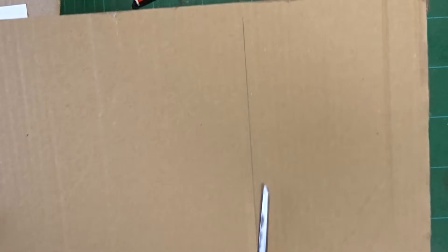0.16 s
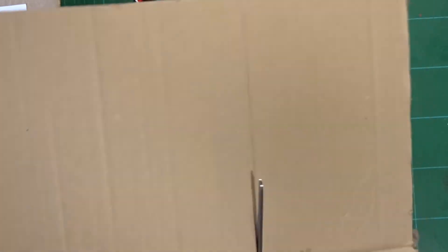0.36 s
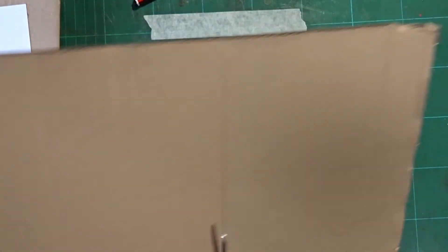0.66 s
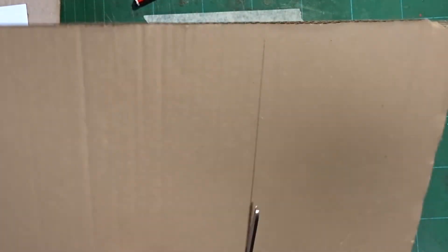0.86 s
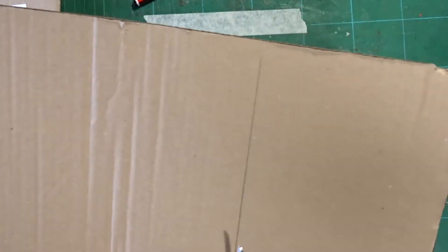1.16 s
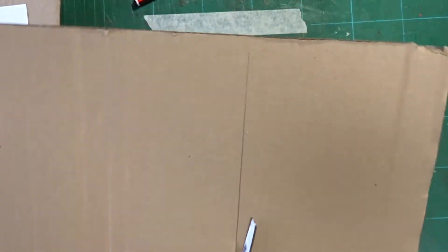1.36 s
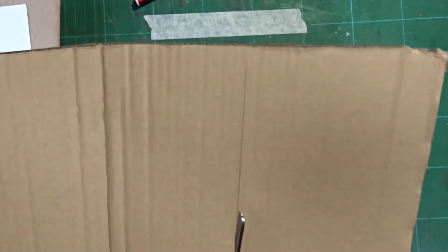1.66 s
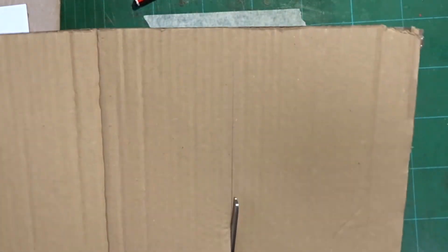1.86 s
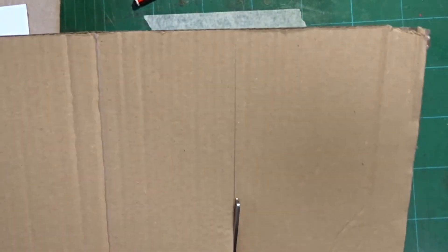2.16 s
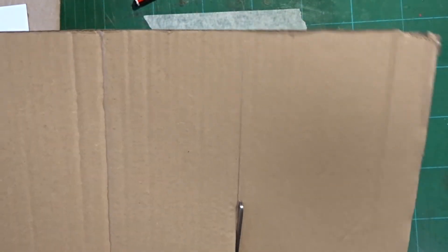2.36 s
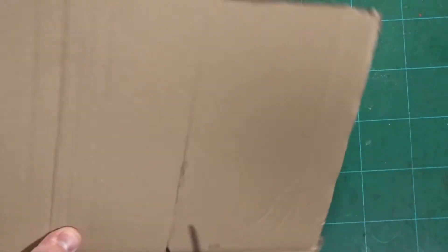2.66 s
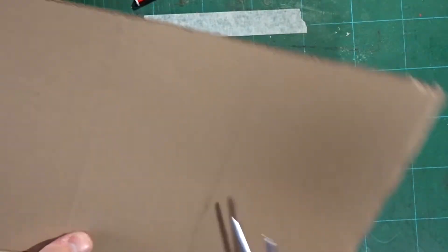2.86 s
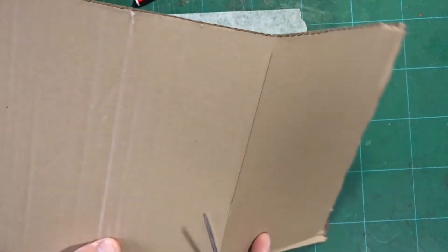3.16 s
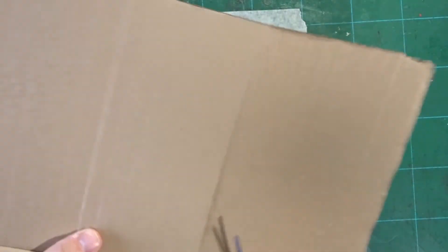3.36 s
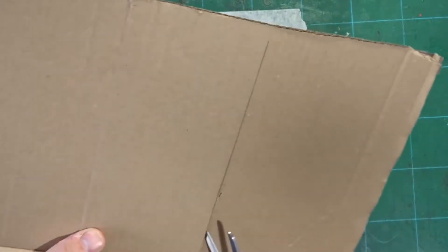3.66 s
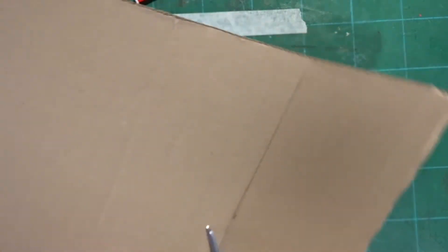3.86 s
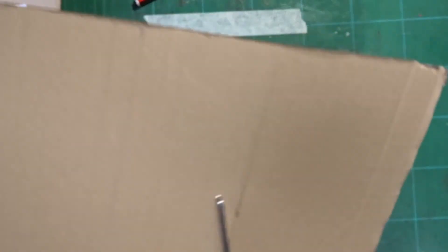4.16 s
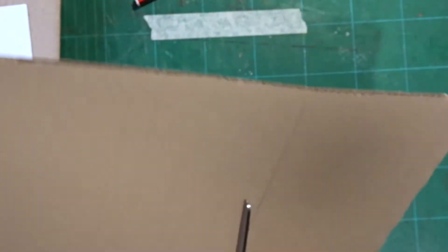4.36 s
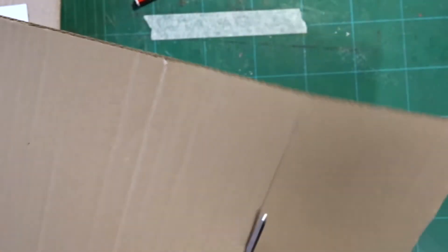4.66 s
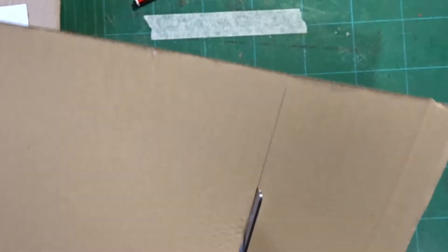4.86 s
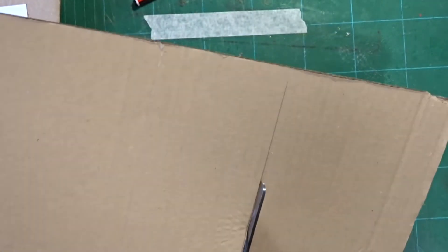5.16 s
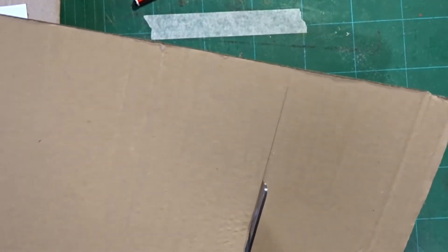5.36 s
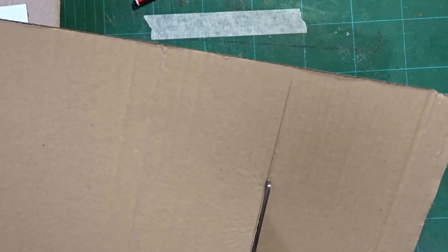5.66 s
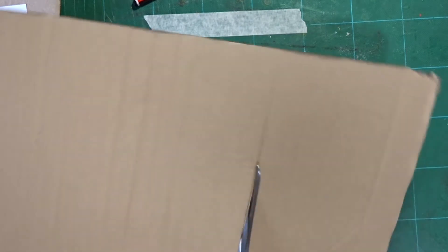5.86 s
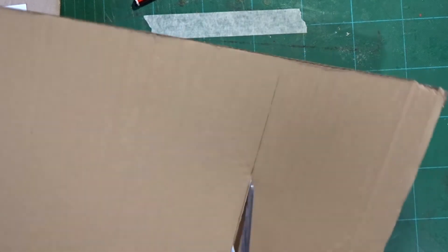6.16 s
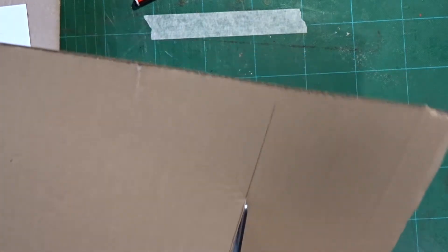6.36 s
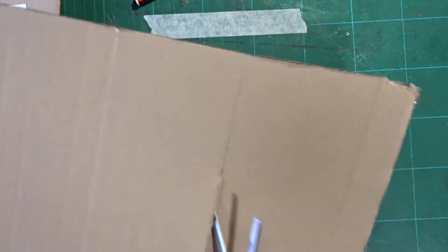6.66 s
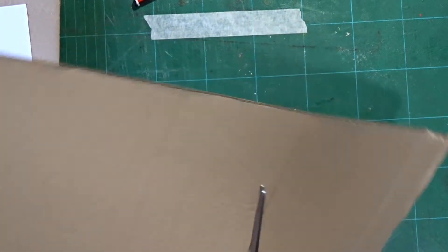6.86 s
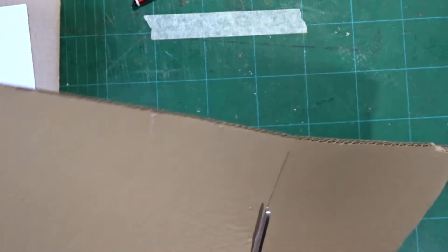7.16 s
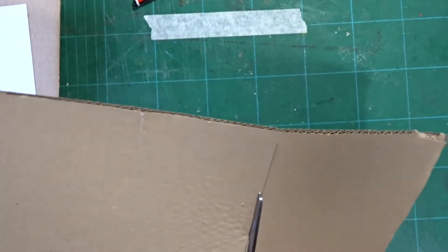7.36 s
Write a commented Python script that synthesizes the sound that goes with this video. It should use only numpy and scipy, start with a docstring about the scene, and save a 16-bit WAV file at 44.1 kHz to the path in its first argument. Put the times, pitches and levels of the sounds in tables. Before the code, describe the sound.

Scissors work through a big sheet of corrugated cardboard, dry scrapes and crunching cracks with hollow board knocks, close up in a quiet room.

```python
"""A small quiet room: scissors are worked through a big sheet of corrugated cardboard held over a table.
Blades and fingers slide on the paper face (stuttering noise in third-octave bands); cut flutes crack
(short noise bursts). The sheet, knocked and flexed, answers with dull board modes (decaying sines), and
groans briefly (resonated noise). The scissor joint ticks now and then. A short echo and room tone lie under it."""
import sys
import numpy as np
from scipy import signal
from scipy.fft import rfft, irfft
from scipy.io import wavfile
from scipy.ndimage import uniform_filter1d

SR = 44100
rng = np.random.default_rng(int(sys.argv[2]) if len(sys.argv) > 2 else 0)


def wrap_up_sound(samples):
    """Save the sound to the file named by the first command line argument, as 16-bit audio."""
    columns = np.atleast_2d(samples).T
    # keep every value between -1 and 1, then stretch to whole-number steps
    tamed = np.clip(columns, -1, 1)
    steps = np.round(tamed * 32767).astype(np.int16)
    wavfile.write(sys.argv[1], SR, steps)


N = 330750
STEP = 40   # samples per point of slow controls

# board modes of the sheet: freq_hz, level_db (relative), t60_s
BOARD_MODES = [(382.7, 1, 0.042), (452.7, -0.5, 0.061), (549.3, 0.5, 0.045), (660, -2.5, 0.058),
               (746, -0.5, 0.036), (886, -0.5, 0.024), (1053, 2, 0.025), (1254, 3, 0.011),
               (1588, -2, 0.019), (1730, -31.5, .02)]
# slow bending modes of the whole sheet: freq_hz, level_db (relative), t60_s
BENDING_MODES = [(49, -15.5, .15), (78.6, -4.5, 0.19), (118, -10, 0.17), (186, 2.5, 0.063),
                 (256, -5.5, 0.11), (274, -3, 0.09)]


def from_db(db):
    """Level to amplitude gain."""
    return 10 ** (np.asarray(db) / 20)


def rms_one(x):
    """Scale to rms 1."""
    return x / np.sqrt(np.mean(x ** 2) + 1e-20)


def at_hz(points, hz):
    """Read a (freq_hz, value) table on a log frequency axis."""
    table = np.array(points)
    return np.interp(np.log(hz), np.log(table[:, 0]), table[:, 1])


def upsample(slow):
    """Slow control points to N samples."""
    return np.interp(np.arange(N) / STEP, np.arange(len(slow)), slow)


def drift(rate_hz):
    """Slow random wander of rms 1: noise through two equal poles at rate_hz."""
    r = np.exp(-2 * np.pi * rate_hz * STEP / SR)
    noise = rng.standard_normal(N // STEP + 2002)
    slow = signal.lfilter([1], [1, -2 * r, r * r], noise)[2000:]   # drop the settling
    return upsample(rms_one(slow))


def ring(force, hz, t60_s):
    """Two-pole resonator: a unit click starts a decaying sine of height 1."""
    r = from_db(-60 / (t60_s * SR))
    w = 2 * np.pi * hz / SR
    return signal.lfilter([0, np.sin(w)], [1, -2 * r * np.cos(w), r * r], force + 1e-18)


def grit(per_s, spread_db):
    """Fibres let go at random: uneven noise bursts, decay constant 0.47 ms, over a fine grain."""
    size_db = spread_db * np.minimum(rng.exponential(1, N), 3.5)
    releases = from_db(size_db) * (rng.random(N) < per_s / SR)
    bursts = signal.lfilter([1], [1, -np.exp(-1 / (0.00047 * SR))], releases)
    return rng.standard_normal(N) * (1 + bursts)


def focus_db(hz, centre_hz):
    """Where the sheet is held favours the modes near one pitch."""
    octaves = np.minimum(np.abs(np.log2(hz / centre_hz)), .7)
    return -12 * octaves ** 2


def rubbing():
    """Levels in dB of rasp, scrape, hiss, drumming and rumble: each rub grips, swells and fades."""
    # rubs of blade or hand on the card: start_s, length_s, swell_db (over the rub), fade_s (30 dB down),
    # then starting levels rasp_db, scrape_db, hiss_db, drum_db, rumble_db
    rubs = [(0.0, 0.037, 2, 0.11, -51.5, -48.5, -45, -42, -43.5),
            (0.099, 0.036, 0.5, 0.065, -59, -55, -42.5, -53, -56),
            (0.182, 0.011, -5, 0.064, -57, -43.5, -47, -58, -66),
            (0.225, .02, -1, 0.15, -58, -59, -57, -50, -54),
            (0.303, 0.086, 6.5, 0.12, -57.5, -59, -45, -56.5, -61),
            (0.48, .21, 12.5, 0.17, -61.5, -54, -45, -62.5, -62.5),
            (0.759, 0.043, -1, .04, -53, -47.5, -47, -48, -54),
            (0.845, .095, -1.5, 0.068, -53, -49, -47, -52.5, -53),
            (0.995, 0.0079, -2, 0.077, -45.5, -49, -45, -47, -35.5),
            (1.078, 0.053, 4.5, 0.066, -54, -51, -45, -46.5, -47),
            (1.182, .04, 0.5, 0.083, -59, -63, -58, -52, -45),
            (1.247, 0.041, 0, 0.054, -46.5, -47.5, -54, -36.5, -58),
            (1.318, 0.021, -5.5, 0.13, -36.5, -44, -44, -37, -48),
            (1.432, 0.058, 5, 0.025, -50.5, -42.5, -42, -40.5, -47),
            (1.545, 0.021, -10, 0.051, -47, -38.5, -37.5, -42, -30.5),
            (1.616, 0.016, -7, .08, -57, -57, -55, -45.5, -51),
            (1.68, 0.076, -3, 0.24, -71, -53.5, -53, -49, -51),
            (1.795, 0.058, -2, .05, -75, -59, -71, -46, -53),
            (1.872, 0.034, -6.5, 0.046, -40, -41.5, -35, -25.5, -44),
            (1.936, 0.096, 1, 0.07, -69, -63.5, -59, -63, -62),
            (2.176, 0.055, 10, 0.12, -44.5, -45.5, -41, -42.5, -47),
            (2.412, 0.032, -1, 0.26, -60, -57, -52.5, -52, -52),
            (2.496, 0.066, 3.5, 0.081, -40, -41, -41.5, -36, -44.5),
            (2.581, 0.098, -1, 0.12, -46, -58, -57, -44, -41),
            (2.698, 0.11, 2, 0.056, -46, -49, -54, -49, -49.5),
            (2.932, 0.054, -1.5, 0.046, -35, -46, -55, -45, -43),
            (3.038, 0.066, 4, 0.3, -54.5, -54, -58, -54, -56),
            (3.133, 0.036, 2.5, .12, -41.5, -46, -49, -43.5, -41.5),
            (3.202, 0.11, 10.5, 0.058, -56.5, -54, -48.5, -53.5, -72),
            (3.363, 0.076, 3, 0.097, -73, -47.5, -44.5, -59, -63),
            (3.585, 0.01, -3, 0.093, -62, -65, -62, -50, -37),
            (3.744, 0.31, -5.5, 0.67, -45.5, -41, -39, -39, -44),
            (4.211, 0.03, 1, 0.27, -49, -38, -41, -33, -36.5),
            (4.455, 0.063, 6, 0.097, -61, -51.5, -54.5, -47, -52),
            (4.59, 0.011, 2.5, 0.044, -46, -32.5, -35.5, -30.5, -40),
            (4.626, 0.071, 6, 0.2, -52.5, -48.5, -44.5, -41.5, -41.5),
            (4.788, 0.043, -0.5, 0.087, -57, -52, -63, -46.5, -45),
            (4.889, 0.067, -7, 0.045, -58.5, -62, -56.5, -43.5, -49),
            (5.05, 0.11, 12, 0.083, -63, -50, -52.5, -48, -63),
            (5.394, 0.011, -10, 0.053, -48, -51, -39, -45, -41),
            (5.438, 0.014, -9.5, 0.063, -41, -33.5, -32, -30, -52),
            (5.523, 0.042, 7, 0.039, -42, -42, -36, -45.5, -44.5),
            (5.61, 0.043, -4.5, 0.044, -46, -42.5, -34, -35, -51),
            (5.651, 0.021, 0, 0.12, -36, -33.5, -38, -29.5, -34.5),
            (5.895, 0.11, -2.5, 0.2, -46, -35.5, -35, -32, -38.5),
            (6.103, .15, 0, 0.15, -59, -49, -49.5, -43.5, -46),
            (6.309, 0.098, -3, 0.14, -62.5, -60, -76.5, -45, -52),
            (6.476, 0.18, 0, 0.044, -50.5, -47.5, -45, -44, -42.5),
            (6.687, 0.16, 8, 0.064, -60, -50, -50, -46, -54.5),
            (6.85, 0.046, -2, .05, -65, -39, -42, -48, -42),
            (6.89, 0.0083, 1, 0.081, -50, -37, -33.5, -29.5, -38),
            (6.992, 0.036, 2, .17, -53, -43.5, -43, -38, -37.5),
            (7.271, 0.11, -8, 0.2, -63.5, -52, -52.5, -40.5, -44),
            (7.46, .05, -0.5, 0.092, -84, -64, -63, -54, -48)]
    # hands merely holding the sheet: rasp_db, scrape_db, hiss_db, drum_db, rumble_db
    holding_db = [-70.5, -71, -67, -63.5, -62]
    grip_s = 0.033   # rise through 30 dB
    sheet_swell, sheet_lingers = 1, 1.21   # drum and rumble: share of the swell, stretch of grip and fade
    t = np.arange(0, N + STEP, STEP) / SR
    swell_share = np.array([1, 1, 1, sheet_swell, sheet_swell])[:, None]
    slower = np.array([1, 1, 1, sheet_lingers, sheet_lingers])[:, None]
    power = from_db(2 * np.array(holding_db))[:, None] + 0 * t
    for start_s, length_s, swell_db, fade_s, *levels_db in rubs:
        grip = np.maximum(start_s - t, 0) / grip_s
        fade = np.maximum(t - start_s - length_s, 0) / fade_s
        progress = np.clip((t - start_s) / length_s, 0, 1)
        shape_db = swell_share * swell_db * progress - 30 * (grip + fade) / slower
        power = power + from_db(2 * (np.array(levels_db)[:, None] + shape_db))
    return [np.interp(np.arange(N) / SR, t, 10 * np.log10(p)) for p in power]


def patchy(x, layers, patchy_db):
    """Third-octave bands carry the (level_db, spectrum) layers and swell on their own as the contact shifts."""
    centres_hz = 700 * 2 ** (np.arange(15) / 3)
    bin_hz = np.maximum(np.fft.rfftfreq(N, 1 / SR), 1)
    place = 3 * np.log2(bin_hz / centres_hz[0])   # position in bands
    shares = [from_db(2 * at_hz(shape, centres_hz)) * centres_hz for _, shape in layers]   # power per band
    powers = [from_db(2 * level_db[::STEP]) / np.sum(share)
              for (level_db, _), share in zip(layers, shares)]
    spectrum, out = rfft(x), np.zeros(N)
    for k in range(len(centres_hz)):
        weight = np.sqrt(np.clip(1 - np.abs(place - k), 0, 1))
        band = rms_one(irfft(spectrum * weight, N))
        gain = np.sqrt(sum(power * share[k] for power, share in zip(powers, shares)))
        swell = from_db(patchy_db * (drift(9) + .6 * drift(70)))
        out += upsample(gain) * swell * band
    return out


def sliding(rasp_db, scrape_db, hiss_db):
    """Friction on paper: a rasp over the hollow flutes, a gritty scrape and a fine hiss that stutter together."""
    # spectrum of the rasp: freq_hz, density_db (per Hz, relative)
    rasp = [(800, -10), (1200, 3.5), (1700, 3), (2200, 4.5), (2800, -2.5), (3600, -19.5)]
    # spectrum of the scrape: freq_hz, density_db (per Hz, relative)
    scrape = [(1800, -28), (2800, 5), (3700, 7.5), (5000, 3), (6500, -7.5), (9000, -31.5)]
    # spectrum of the fine hiss: freq_hz, density_db (per Hz, relative)
    hiss = [(4000, -10), (6500, -5.5), (9000, -4.5), (12500, -3), (14500, -5.5), (18000, -9.5)]
    layers = [(rasp_db, rasp), (scrape_db, scrape), (hiss_db, hiss)]
    stutter = from_db(1.5 * drift(34) - 5.0)
    return stutter * patchy(grit(260, spread_db=2.0), layers, patchy_db=2.5)


def shake(force, modes, centre_hz=None):
    """A steady rough force keeps the modes sounding; rms 1 before any focus."""
    rings = [from_db(db) * ring(force, hz, t60_s) * (-1) ** k for k, (hz, db, t60_s) in enumerate(modes)]
    plain_rms = np.sqrt(np.mean(sum(rings) ** 2))
    if centre_hz is not None:
        rings = [r * from_db(focus_db(mode[0], centre_hz)) for r, mode in zip(rings, modes)]
    return sum(rings) / plain_rms


def flexing(drum_db, rumble_db):
    """The sheet drums (board modes) and rumbles (bending modes) under the hands."""
    centre_hz, wander_octaves = 527, 0.34
    drum_hz = centre_hz * 2 ** (wander_octaves * drift(1.7))
    drum_gain = from_db(drum_db + 1.41 * drift(21))
    drum = drum_gain * shake(grit(100, spread_db=2.5), BOARD_MODES, drum_hz)
    rumble_gain = from_db(rumble_db + 0.63 * drift(2.9))
    rumble = rumble_gain * shake(rng.standard_normal(N), BENDING_MODES)
    return drum + rumble


def room_tone():
    """Steady noise given the spectrum of the quiet room."""
    # room tone: freq_hz, density_db (per Hz, relative)
    air_spectrum = [(12, -25), (20, 16.5), (104, 4.5), (310, 1), (780, -4.5), (1610, -19.5), (1810, -27),
                    (4810, -25), (13200, -50.5), (16000, -21.5)]
    air_rms_db = -59.5
    hz = np.maximum(np.fft.rfftfreq(N, 1 / SR), 1)
    spectrum = rfft(rng.standard_normal(N)) * from_db(at_hz(air_spectrum, hz))
    return from_db(air_rms_db) * rms_one(irfft(spectrum, N))


def snaps(friction_db, count):
    """Small breaks at random moments, stronger when the rubbing is; rows as for cracks."""
    level_at_ref_db, friction_ref_db, follows, spread_db = -43, -49, .3, 5
    median_hz, median_ms = 8000, 1.5
    at = rng.integers(0, N, count)
    luck = rng.standard_normal((count, 3))
    level_db = level_at_ref_db + follows * (friction_db[at] - friction_ref_db) + spread_db * luck[:, 0]
    centre_hz = np.clip(median_hz * 2 ** (1.2 * luck[:, 1]), 2000, 14000)
    length_ms = median_ms * 2 ** (0.64 * luck[:, 2])
    return list(zip(at / SR, level_db, centre_hz, length_ms))


def cracks(friction_db):
    """A break is a spike and a few ms of dying splinters, strongest around its own pitch."""
    # fibres and flutes breaking: start_s, level_db (relative), centre_hz, length_ms
    crack_rows = [(0.0257, -21.5, 7950, 2.1), (0.0374, -23, 4080, 5.1), (0.1185, -32, 6900, 2.7),
                  (0.1784, -21.5, 4570, 7.7), (0.227, -30, 6500, 5.1), (0.2579, -23.5, 6350, 2.4),
                  (0.804, -30, 7360, 2.7), (0.972, -26, 6260, 4), (0.987, -16, 5560, 4.7),
                  (1.0043, -18.5, 3380, 1.8), (1.109, -10, 5440, 2.7), (1.182, -26.5, 4330, 1.9),
                  (1.251, -22.5, 2920, 7), (1.2664, -26, 3680, 7.2), (1.316, -7.5, 4460, 1.8),
                  (1.483, -21, 5200, 4.5), (1.5336, -14, 3100, 1.3), (1.616, -33.5, 3900, 3.9),
                  (1.694, -32, 4530, 4.4), (1.6987, -21.5, 3970, 1.9), (1.7388, -37, 9000, 2.1),
                  (1.768, -36, 4500, 6.0), (1.7928, -47, 4300, 8), (1.874, -23, 3940, 8.5),
                  (1.946, -28, 12700, 2.3), (1.968, -30, 10200, 0.87), (2.0176, -35.5, 12400, 5.2),
                  (2.0518, -46, 10300, 2.1), (2.1197, -44, 4000, 1.8), (2.169, -21, 5800, 5.6),
                  (2.178, -32, 5500, 4), (2.202, -10.5, 8100, 16), (2.211, -3.5, 6500, 1.1),
                  (2.2278, 1, 3850, 1.54), (2.2626, -29.5, 12500, 1.8), (2.2917, -30, 7300, 1.6),
                  (2.34, -33, 8000, 1.7), (2.478, -12.5, 2530, 2.5), (2.522, -9.5, 7600, 1.9),
                  (2.5395, -17.5, 7800, 2.5), (2.5612, -19, 7700, 2.6), (2.656, -26, 5070, 3.5),
                  (2.6919, -12, 2900, 1.4), (2.9374, -13.5, 5470, 4.1), (2.958, -4.5, 6860, 4.8),
                  (3.013, -21, 5340, 2.7), (3.0204, -12.5, 6000, 1.7), (3.0419, -17.5, 3080, 2.1),
                  (3.418, -23, 9800, 2.5), (3.3855, -31, 3900, 3.7), (3.433, -35, 8240, 3.15),
                  (3.448, -25, 8400, 1.8), (3.456, -14, 11700, 2.2), (3.583, -30.5, 4600, 1.6),
                  (3.8562, -19, 2860, 2.6), (4.0598, -26, 8500, 2.1), (4.1115, -29, 5100, 3.7),
                  (4.2187, -17.5, 3470, 0.68), (4.465, -23.5, 6460, 0.63), (4.5984, -20.5, 4500, 13.4),
                  (4.612, -22, 5000, 1.4), (4.826, -23, 9300, 1.9), (4.843, -23, 7600, 1.6),
                  (5.066, -29, 4100, 1.9), (5.357, -36, 6550, 4.1), (5.3889, -18.5, 4440, 18),
                  (5.4322, -25, 5500, 1.9), (5.4593, -13, 11300, 1.1), (5.5082, -27.5, 10600, 2.7),
                  (5.5256, -14, 5800, 9.3), (5.5277, 1, 6300, 0.58), (5.552, -2, 3350, 4.4),
                  (5.557, -10.5, 3770, 2.1), (5.5663, -28.5, 4760, 3), (5.608, -2.5, 4600, 1.1),
                  (5.617, -18.5, 4240, 10), (5.64, -7.5, 3960, 2.7), (5.6522, -11.5, 5500, 1.9),
                  (5.6566, 11, 5100, 3.9), (5.865, -31.5, 4800, 3.1), (5.904, -10.5, 3230, 0.73),
                  (5.947, -15.5, 5500, 1.2), (6.1072, -25.5, 6100, 2.3), (6.1567, -24, 5300, 2),
                  (6.483, -11, 6200, 3.4), (6.4983, -28, 7500, 2.6), (6.548, -13.5, 3430, 2.2),
                  (6.5668, -15, 5750, 2.7), (6.572, -14.5, 6500, 4.9), (6.613, -23.5, 4700, 4.5),
                  (6.893, -19, 4860, 4.3), (6.8972, -12.5, 4300, 1.8), (7.068, -29.5, 6300, 4.4),
                  (7.2888, -31.5, 4960, 2.4), (7.449, -41.5, 4040, 4)]
    rows = crack_rows + snaps(friction_db, count=160)
    size = 2048
    out, t = np.zeros(N + size), np.arange(size) / SR
    noise = rng.standard_normal((len(rows), size))
    thin = signal.butter(1, 900, "high", fs=SR)
    for (start_s, level_db, hz, length_ms), splinters in zip(rows, noise):
        fall_s = length_ms / 1000 / np.log(30)   # main part is down 30-fold after its length
        decay = np.exp(-t / fall_s) + from_db(-16) * np.exp(-t / 0.0043)
        burst = splinters * decay * np.clip(t / (0.1 * fall_s), 0, 1)
        burst[round(.25 * fall_s * SR)] = 0.95   # spike
        edges_hz = [hz / 1.9, min(hz * 1.9, .45 * SR)]
        core = signal.sosfilt(signal.butter(2, edges_hz, "band", fs=SR, output="sos"), burst)
        burst = signal.lfilter(*thin, core + from_db(-8) * burst)
        peak_rms = np.sqrt(np.max(uniform_filter1d(burst ** 2, size=26)))   # loudest 0.6 ms
        i = round(start_s * SR)
        out[i:i + size] += from_db(level_db - 6.0) * burst / peak_rms
    return out[:N]


def strike(times_s, levels_db, modes, scatter_db, centre_hz=None):
    """Each blow excites every mode with a strength and sign of its own."""
    out, at = np.zeros(N), (np.asarray(times_s) * SR).astype(int)
    luck = rng.standard_normal((len(at), len(modes), 2))
    for k, (hz, mode_db, t60_s) in enumerate(modes):
        favour_db = 0 if centre_hz is None else focus_db(hz, centre_hz)
        sign = np.where(luck[:, k, 1] > .5, 1, -1)
        clicks = np.zeros(N)
        clicks[at] = sign * from_db(levels_db + mode_db + favour_db + scatter_db * luck[:, k, 0])
        out += ring(clicks, hz, t60_s)
    return out


def knocks():
    """A blow bends the sheet at a pitch set by the grip, then the bending and board modes ring."""
    # blows taken by the sheet: start_s, thud_db (relative), thud_hz, ring_db (relative), ring_centre_hz
    blow_rows = [(0.0339, -37, 188, -26, 434), (0.224, -44.5, 207, -28.5, 517),
                 (0.8038, -28.5, 78, -29, 620), (0.985, -28.5, 172, -23.5, 740),
                 (1.002, -32, 171, -28, 540), (1.1735, -24.5, 190, -22, 525), (1.2539, -56, 258, -25, 537),
                 (1.316, -34, 157, -13.5, 456), (1.5332, -24, 267, -45, 390), (1.6917, -38, 177, -35, 480),
                 (1.7684, -34, 95.5, -27.5, 480), (1.8516, -18.5, 210, -16.5, 410),
                 (1.883, -23.5, 217, -46, 470), (2.122, -44, 292, -32, 480), (2.169, -37, 214, -18.5, 606),
                 (2.2019, -41, 207, -4.5, 665), (2.211, -35, 233, -8, 625), (2.2276, -36, 212, -8.5, 590),
                 (2.4804, -50, 294, -18.5, 600), (2.4953, -44, 234, -24, 680), (2.6903, -39, 158, -25, 425),
                 (2.9359, -10, 119, -10.5, 460), (2.961, -26, 141, -19, 600),
                 (3.0422, -33, 166, -22.5, 543), (3.1381, -17, 176, -17, 470),
                 (3.5827, -29.5, 233, -30.5, 440), (3.74, -32, 253, -25, 550),
                 (3.768, -24.5, 228, -40, 550), (3.846, -27, 186, -50, 570), (3.8558, -19, 184, -15.5, 590),
                 (4.221, -17.5, 179, -10, 500), (4.584, -51, 183, -28, 610), (4.6072, -28.5, 231, -40, 520),
                 (4.688, -25.5, 243, -30, 590), (5.3548, -56, 270, -26.5, 710),
                 (5.3917, -29.5, 288, -11, 496), (5.4338, -33, 284, -21.5, 720),
                 (5.4541, -39, 264, -26.5, 600), (5.527, -38.5, 286, -7, 584),
                 (5.5503, -23.5, 217, -12, 630), (5.606, -48, 296, -12, 590), (5.617, -45, 215, -14.5, 560),
                 (5.64, -29, 236, -16.5, 630), (5.657, -25.5, 181, 10.5, 640), (5.8484, -68, 279, -28, 696),
                 (5.8975, -37, 187, -16.5, 620), (5.947, -36, 177, -24, 490), (5.9832, -31, 195, -13, 484),
                 (6.0024, -19, 148, -36, 560), (6.4825, -48, 300, -17.5, 610),
                 (6.5461, -32, 287, -18.5, 680), (6.572, -43, 239, -19.5, 640),
                 (6.6043, -28.5, 135, -15.5, 570), (6.8601, -14, 116, -50, 460),
                 (6.8906, -1, 192, -11, 430), (7.0641, -29, 277, -21, 450), (7.2916, -17.5, 196, -29, 414),
                 (7.4503, -41, 167, -38, 470)]
    start_s, thud_db, thud_hz, ring_db, ring_hz = np.transpose(blow_rows)
    size = 8192
    thuds, t = np.zeros(N + size), np.arange(size) / SR
    early_s = t + 0.0015 * (1 - np.exp(-t / 0.001))   # short bending waves run ahead: pitch falls at first
    for start, db, hz in zip(start_s, thud_db, thud_hz):
        i = round(start * SR)
        thuds[i:i + size] -= from_db(db) * np.exp(-t / 0.0097) * np.sin(2 * np.pi * hz * early_s)
    bending = strike(start_s, thud_db - 14.0, BENDING_MODES, scatter_db=4)
    board = strike(start_s, ring_db - 13.0, BOARD_MODES, scatter_db=5.5, centre_hz=ring_hz)
    soft_contact = signal.butter(2, 2200, fs=SR, output="sos")   # card is soft
    return signal.sosfilt(soft_contact, thuds[:N] + bending + board)


def groans():
    """The sheet groans as a blade is forced along it: stick and slip hold one board resonance for a moment."""
    # groans: start_s, end_s, pitch_hz, level_db
    groan_rows = [(1.804, 1.882, 644, -35), (2.492, 2.517, 707, -32.5), (5.119, 5.192, 598, -32.5)]
    out, t = np.zeros(N), np.arange(N) / SR
    for start_s, end_s, hz, level_db in groan_rows:
        tone = rms_one(ring(ring(rng.standard_normal(N), hz, 0.018), hz, 0.018))
        progress = np.clip((t - start_s) / (end_s - start_s), 0, 1)
        out += from_db(level_db) * tone * np.sqrt(np.sin(np.pi * progress).clip(0))
    return out


def ticks():
    """Short clicks of the joint: a bright edge, then a ring that swells over a cycle inside the handle."""
    # scissor joint clicks: start_s, level_db (relative)
    tick_rows = [(4.0013, -29.5), (5.899, -37), (6.2487, -25.5), (6.253, -39), (6.2635, -44), (6.2682, -38),
                 (6.549, -27)]
    # joint modes: freq_hz, level_db (relative), t60_s
    joint_modes = [(2000, -7, 0.008), (2360, 8, 0.0045), (2750, 9.5, 0.0059)]
    start_s, level_db = np.transpose(tick_rows)
    clicks = np.zeros(N)
    clicks[np.round(start_s * SR).astype(int)] = -from_db(level_db - 15.5)
    joint = sum(from_db(db) * ring(clicks, hz, t60_s) for hz, db, t60_s in joint_modes)
    handle = ring(joint, 2230, 0.0035)
    return handle + from_db(18) * clicks


def room(x):
    """Table and near walls return a dense tail that dies octave by octave."""
    # echo decay: freq_hz, t60_s
    echo_t60 = [(100, 0.28), (300, 0.24), (1000, 0.095), (4000, 0.071), (12000, 0.18)]
    t, tail = np.arange(SR // 2) / SR, 0
    for low_hz in 40 * 2.0 ** np.arange(9):
        edges_hz = [low_hz, min(2 * low_hz, .45 * SR)]
        octave = signal.butter(2, edges_hz, "band", fs=SR, output="sos")
        t60_s = at_hz(echo_t60, 1.4 * low_hz)
        tail = tail + signal.sosfilt(octave, rng.standard_normal(len(t))) * from_db(-60 * t / t60_s)
    tail = tail * np.clip(t / 0.013, 0, 1)   # reflections build up over 13 ms
    return signal.fftconvolve(x, tail / np.sqrt(np.sum(tail ** 2)))[:N]


def scene():
    """All sources, their echo and the room tone."""
    echo_db = -18.5
    rasp_db, scrape_db, hiss_db, drum_db, rumble_db = rubbing()
    work = sliding(rasp_db, scrape_db, hiss_db) + flexing(drum_db, rumble_db)
    work = work + cracks(np.maximum(scrape_db, hiss_db)) + knocks() + groans() + ticks()
    no_deep_bass = signal.butter(2, 60, "high", fs=SR, output="sos")   # an open sheet radiates none
    work = signal.sosfilt(no_deep_bass, work)
    return (work + from_db(echo_db) * room(work) + room_tone())[None]


def record(dry):
    """The loudest cracks overload (hard clip); the top is cut, 55 dB down from 16.3 kHz."""
    held = np.clip(dry, -.9, .9)
    return signal.sosfilt(signal.cheby2(12, 55, 16300, fs=SR, output="sos"), held)


dry = scene()
out = record(dry)
wrap_up_sound(out)
```